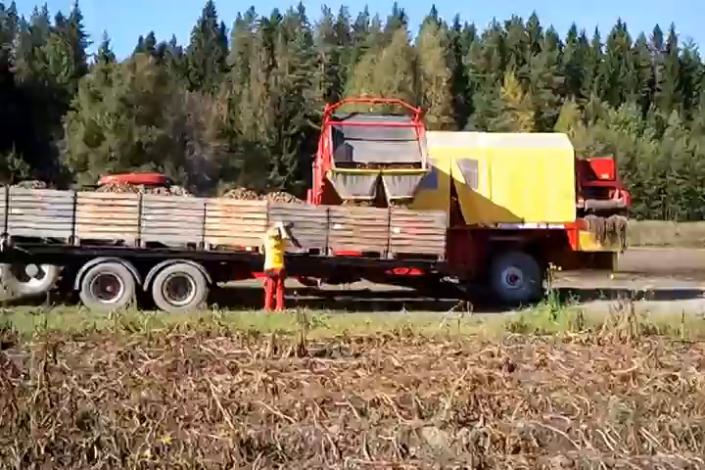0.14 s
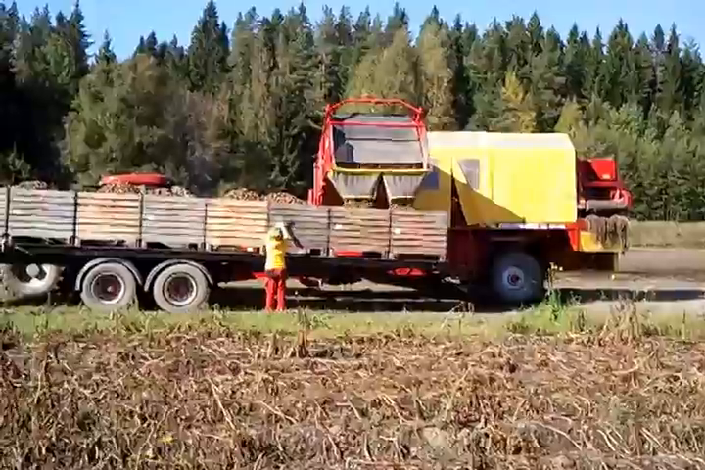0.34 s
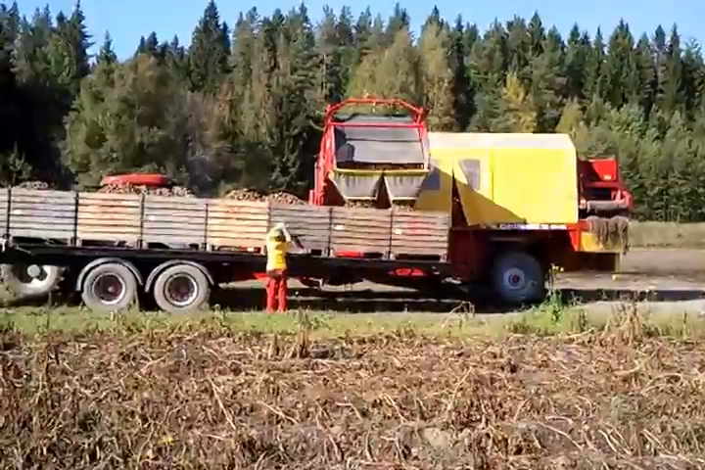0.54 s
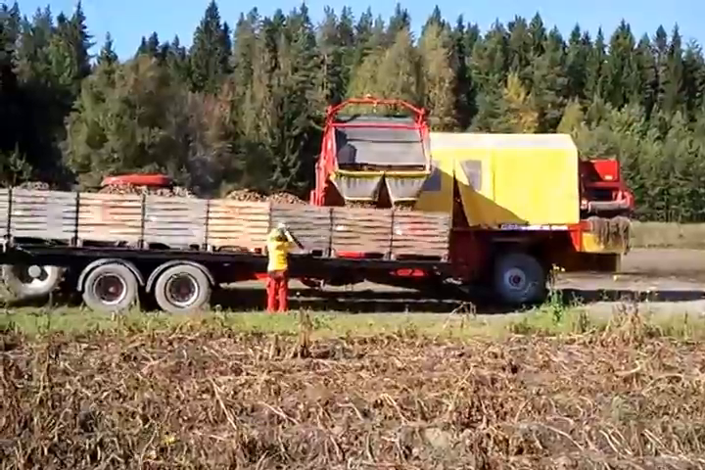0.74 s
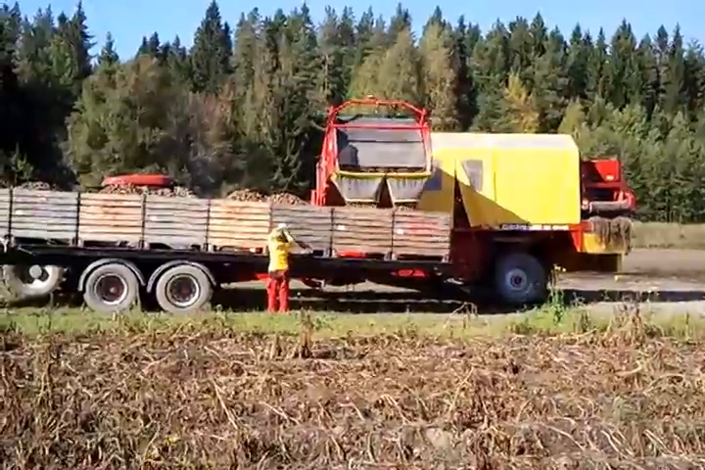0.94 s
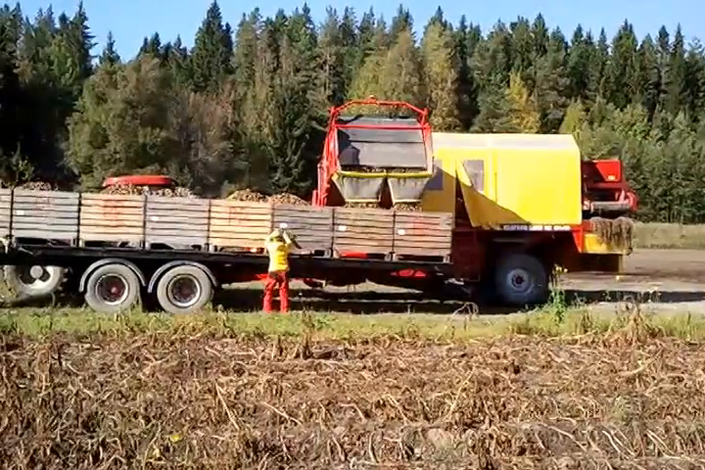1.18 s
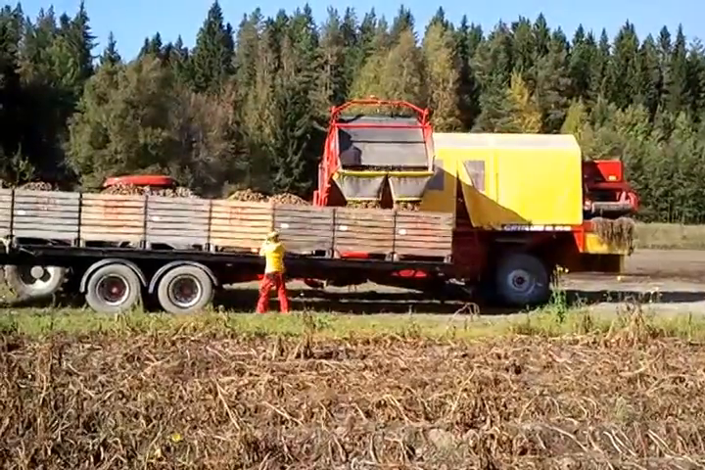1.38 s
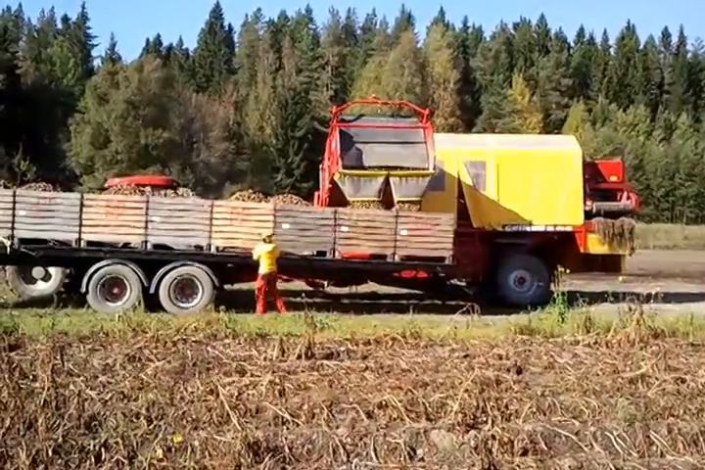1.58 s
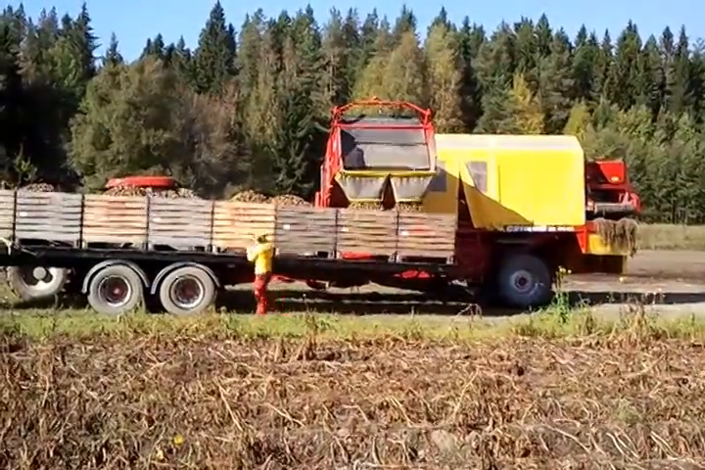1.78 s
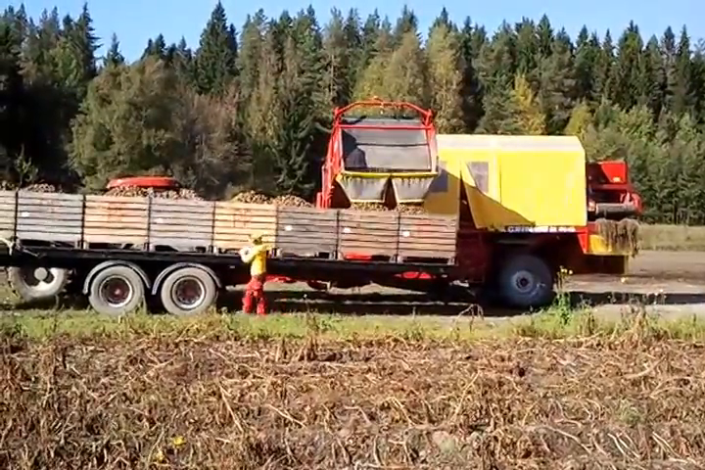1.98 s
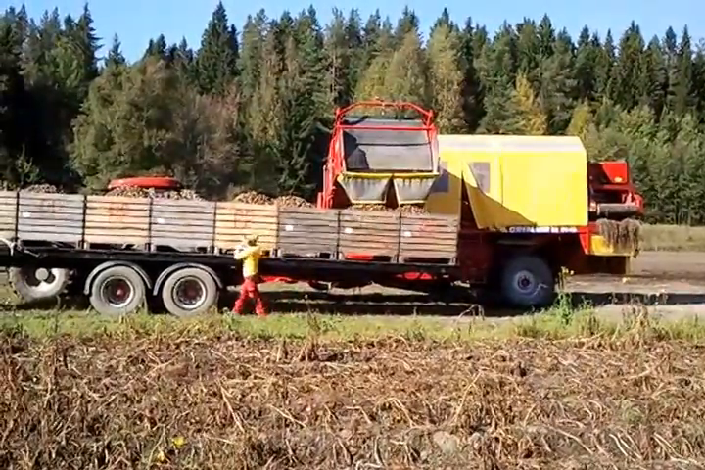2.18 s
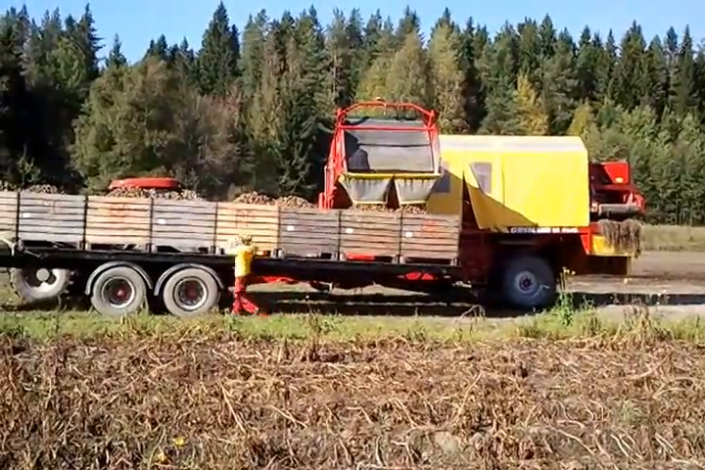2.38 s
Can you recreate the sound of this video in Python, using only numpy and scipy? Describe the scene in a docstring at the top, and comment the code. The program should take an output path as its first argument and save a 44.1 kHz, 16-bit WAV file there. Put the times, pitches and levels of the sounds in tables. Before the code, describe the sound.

A diesel harvester throbs steadily outdoors, its conveyor whining in pulses amid blurred clatter. Two sharp wooden crate knocks land close together near the microphone, surrounded by small ticks, scrapes and bumps, while dry rustling fades.

```python
"""Throughout runs the low throb of a diesel harvester, with a pulsing conveyor whine and a blur of clatter.
The throb and whine are sums of sine tones; rumble, chug and clatter are noise shaped in pitch and level.
Two sharp wooden knocks stand out: crates land with a noisy crack, ring as fading tones and rattle.
Short bursts of shaped noise make ticks, clicks, scrapes and bumps of handling.
Behind them a dry, bright rustle of grainy noise slowly fades."""
import sys
import numpy as np
from scipy.fft import rfft, irfft, next_fast_len
from scipy.io import wavfile
from scipy.ndimage import map_coordinates

SR = 44100
rng = np.random.default_rng(int(sys.argv[2]) if len(sys.argv) > 2 else 0)


def file_out(sig):
    """Save sig as 16-bit WAV at sys.argv[1]."""
    # one column per channel
    cols = np.atleast_2d(sig).T
    # limit, then scale
    lim = np.clip(cols, -1, 1)
    pcm = np.round(lim * 32767).astype(np.int16)
    wavfile.write(sys.argv[1], SR, pcm)


N = 111132


def amp(db):
    """Turn decibels into a gain."""
    return 10 ** (np.asarray(db) / 20)


def unit(x):
    """Scale to an rms (average strength) of 1."""
    return x / np.sqrt(np.mean(x ** 2) + 1e-20)


def clock():
    """Time of every sample, in seconds."""
    return np.arange(N) / SR


def curve(rows):
    """Join (time, value) points with straight lines."""
    return np.interp(clock(), *np.transpose(rows))


def wobble(rate):
    """A smooth random curve shaped by `rate` random points a second."""
    return map_coordinates(rng.standard_normal(4096), [clock() * rate + 2], mode="wrap")


def colour(x, points):
    """Filter x by (frequency, level) points, then bring it to rms 1; only the shape of the points counts."""
    m = next_fast_len(N + 8192)
    hz, db = np.transpose(points)
    log_hz = np.log(np.fft.rfftfreq(m, 1 / SR) + 1)
    gain = amp(np.interp(log_hz, np.log(hz), db))
    return unit(irfft(rfft(x, m) * gain, m)[:N])


def noise(points):
    """Steady noise with the given spectrum, at rms 1."""
    return colour(rng.standard_normal(N), points)


def burst(start, rise, hold, t60):
    """Loudness shape: straight rise, hold, then a fade of 60 dB per t60 seconds."""
    t = clock() - start
    fade = amp(-60 * np.maximum(t - rise - hold, 0) / t60)
    return np.clip(t / rise, 0, 1) * fade


# engine speed: t/s, firings per second
FIRING_RATE = [(0, 46), (.2, 45.1), (.35, 44), (.6, 43.4), (.8, 44.1), (1.05, 45.2), (1.25, 45.9),
               (1.55, 45.3), (1.8, 45.4), (2.15, 45), (2.28, 44), (2.52, 44.8)]


def crank_angle():
    """Radians turned by the crankshaft, which fires twice a turn."""
    return np.pi * np.cumsum(curve(FIRING_RATE)) / SR


def stroke():
    """Swing from -1 to 1 once per crankshaft turn."""
    peak_at = 0.45  # share of a turn
    return np.cos(crank_angle() - 2 * np.pi * peak_at)


# exhaust tones: f/multiple of the crankshaft rate, base level/dB, wavering level/dB
EXHAUST_TONES = [(2, -37.3, .9), (2.5, -53, 1.5), (3, -68, 5), (4, -41, .4), (5, -48, 2.5), (6, -60.5, 4.5),
                 (7, -66, 5), (9, -65, 1)]
# change of the tones above the firing rate: t/s, added level/dB
OVERTONE_LEVEL = [(0, -0.5), (.22, 1), (.45, -1.5), (1.0, -2.5), (1.12, 2.5), (1.5, 0.4), (2.05, -0.5),
                  (2.4, -3)]
SHAFT_JITTER = 0.014  # size of the uneven turning, radians


def exhaust():
    """The throb: tones locked to the crankshaft, each wavering in level and timing."""
    crank = crank_angle()
    throb = np.zeros(N)
    for multiple, db, waver_db in EXHAUST_TONES:
        level = db + waver_db * wobble(9.19)
        if multiple > 2:  # 2 is the firing rate
            level = level + curve(OVERTONE_LEVEL)
        angle = crank + SHAFT_JITTER * wobble(26.85)
        throb += amp(level) * np.sin(multiple * angle)
    return np.sqrt(2) * throb


# spectrum of the low machine noise: f/Hz, relative level/dB per Hz
RUMBLE_SPECTRUM = [(5, -3), (30, -7), (55, -1.5), (90, 0.5), (135, 1.5), (175, -10), (215, -5), (280, -10),
                   (370, -7.5), (450, -10), (540, -6), (660, -10), (740, -20), (1100, -26.5), (2500, -53)]
# rumble loudness before wavering: t/s, level/dB
RUMBLE_LEVEL = [(0, -41.5), (.5, -43.5), (1.1, -44), (1.33, -47.5), (1.6, -44.5), (1.95, -46.5),
                (2.52, -49.5)]


def rumble():
    """Low machine noise that follows a level curve and wavers quickly."""
    level = curve(RUMBLE_LEVEL) + 1.6 * wobble(35.45)
    return amp(level) * noise(RUMBLE_SPECTRUM)


# housing resonance: f/Hz, relative level/dB per Hz
CHUG_SPECTRUM = [(350, -36), (520, -5), (600, 3.5), (640, -2), (680, -6), (740, -29.5)]
CHUG_DB, CHUG_SWING_DB, CHUG_SCATTER_DB = -61.5, 7, 2.5


def chug():
    """A resonant housing colours noise that swells once per crankshaft turn."""
    level = CHUG_DB + CHUG_SWING_DB * stroke() + CHUG_SCATTER_DB * wobble(22.26)
    return amp(level) * noise(CHUG_SPECTRUM)


# spectrum of the machine clatter: f/Hz, relative level/dB per Hz
CLATTER_SPECTRUM = [(300, -7.5), (780, 1), (900, 3.5), (1100, -1.5), (1700, -0.5), (1900, -3), (2450, -1),
                    (3100, -7), (4300, -11), (5800, -7.5), (8000, -18.5), (14300, -31), (14800, -60)]
# clatter loudness before pulsing and wavering: t/s, level/dB
CLATTER_CURVE = [(0, -49), (.25, -49.5), (.45, -50), (1.0, -48), (1.5, -50.5), (1.8, -51.5), (2.52, -53.5)]


def clatter():
    """A blur of machine noise that pulses slightly with every firing."""
    level = curve(CLATTER_CURVE) + 0.5 * wobble(20)
    pulse = 1 + 0.12 * np.sin(2 * crank_angle())
    return amp(level) * pulse * noise(CLATTER_SPECTRUM)


def harvester():
    """Exhaust throb follows the crankshaft, with rumble, chugging housing and clatter beside it."""
    return exhaust() + rumble() + chug() + clatter()


# conveyor drive tones before drift, swelling and wavering: f/Hz, level/dB
WHINE_TONES = [(620, -55.5), (643, -59.5), (1750, -68)]
WHINE_DRIFT_HZ, WHINE_PULSE = 2.41, 0.67


def conveyor():
    """Whining drive tones drift together and swell once per crankshaft turn."""
    drift = WHINE_DRIFT_HZ * wobble(21.86)
    whine = np.zeros(N)
    for hz, db in WHINE_TONES:
        turns = np.cumsum(hz + drift) / SR + rng.random()
        whine += np.sqrt(2) * amp(db) * np.sin(2 * np.pi * turns)
    swell = 1 + WHINE_PULSE * stroke()
    return amp(1.6 * wobble(14.13)) * swell * whine


def ring(modes, start, rise, scatter):
    """A struck crate sounds as fading tones; scatter randomises where each starts in its swing."""
    t = clock() - start
    out = np.zeros(N)
    for hz, db, t60 in modes:
        turns = hz * t + scatter * rng.random()
        out += amp(db) * burst(start, rise, 0, t60) * np.sin(2 * np.pi * turns)
    return out


# the slats rattling on after a knock: f/Hz, relative level/dB per Hz
RATTLE_SPECTRUM = [(150, -14), (350, -5), (650, 2), (950, -11), (1600, -3.5), (2400, -6), (3300, -15),
                   (4300, -30), (5900, -8), (7500, -14), (8800, -4), (11000, -4), (13500, -15),
                   (14800, -24)]
RATTLE_DB, RATTLE_T60, RATTLE_ROUGH_DB = -28, 0.16, 5.5


def rattle(start, rise, hold):
    """Loose slats rattle on after a knock as rough, fading noise."""
    rough = rng.standard_normal(N) * amp(RATTLE_ROUGH_DB * wobble(450))
    slats = colour(rough, RATTLE_SPECTRUM)
    return amp(RATTLE_DB) * burst(start, rise, hold, RATTLE_T60) * slats


# the two landings: t/s, crack level/dB, ring level/dB, rise t/s, hold t/s,
# rebound delay t/s, rebound crack level/dB relative to the first crack
LANDINGS = [(0.8107, -13.5, -25.5, 0.00028, 0.002, 0.011, -11.5),
            (1.1897, -12, -25, 0.0024, 0.0033, 0.0093, -12)]
# tones of the first and second crate: f/Hz, relative level/dB, time to fade by 60 dB t/s
FIRST_CRATE = [(406, -15.5, 0.12), (552, -8, 0.075), (625, -12, 0.19), (890, -8, .1), (950, 11.5, .018),
               (1245, -10.5, 0.086), (1554, -6.5, 0.071), (1687, -8.5, 0.11), (2073, 0, 0.057),
               (2384, -3.5, 0.047), (3000, -9, .04), (6340, -18, .06), (8600, -3, 0.027), (9700, -5, .06),
               (11400, -4, .083), (12200, -1, 0.057)]
SECOND_CRATE = [(347, -15, .15), (395, -9, 0.19), (656, 1.5, 0.15), (929, -3.5, 0.12), (961, 8.5, 0.046),
                (1218, -2.5, 0.073), (1445, -7, 0.091), (1582, -1, 0.11), (1710, -7, .05),
                (2086, -4, 0.054), (2493, 3, .03), (2570, -9, 0.052), (6160, 0, .025), (8750, -4, .06),
                (10086, 1, 0.083), (10550, -8, .06), (11300, -12, .09)]
# crack of a contact: f/Hz, relative level/dB per Hz
CRACK_SPECTRUM = [(150, -17), (400, -7.5), (900, -10), (1400, -17), (2400, -8), (3300, -21.5), (4300, -26),
                  (5800, -11.5), (6500, -18), (7500, -24), (8750, -1), (10200, -4), (10900, 7),
                  (11400, 1.5), (12200, -2), (13300, -19), (14500, -16), (15000, -31)]
CRACK_T60, REBOUND_T60, REBOUND_HOLD_S = 0.026, 0.031, 0.0083
# new ringing, relative to the first: at the rebound, then as the crate settles (s after the blow)
REBOUND_RING_DB, SETTLE_S, SETTLE_DB = -6, 0.031, -17


def knocks():
    """Each crate lands with a short crack, rings, rebounds, settles and rattles out."""
    out = np.zeros(N)
    for landing, modes in zip(LANDINGS, (FIRST_CRATE, SECOND_CRATE)):
        start, crack_db, ring_db, rise, hold, delay, rebound_db = landing
        blow = burst(start, rise, hold, CRACK_T60)
        rebound = amp(rebound_db) * burst(start + delay, rise, REBOUND_HOLD_S, REBOUND_T60)
        # the two contacts add by energy
        out += amp(crack_db) * np.hypot(blow, rebound) * noise(CRACK_SPECTRUM)
        out += rattle(start, rise, hold)

        # only the longer-lasting tones ring anew
        lasting = [mode for mode in modes if mode[2] > CRACK_T60 * 2]
        rebound_ring = amp(REBOUND_RING_DB) * ring(lasting, start + delay, rise, 0.98)
        settling_ring = amp(SETTLE_DB) * ring(lasting, start + SETTLE_S, rise, 0.95)
        first_ring = ring(modes, start, rise, 0)
        out += amp(ring_db) * (first_ring + rebound_ring + settling_ring)
    return out


# wood spectrum shared by scrapes and clicks: f/Hz, relative level/dB per Hz
WOOD_SPECTRUM = [(200, -26), (600, -9), (1000, -10), (1600, 5), (2400, 5), (3300, -2), (4500, -8),
                 (6200, -2.5), (7500, -7), (10000, 4), (14000, -33)]
# wood scraping: start t/s, length t/s, level/dB at the middle of the swell
SCRAPE_EVENTS = [(0.18, 0.085, -49.5), (0.722, 0.034, -44), (0.99, 0.078, -43.5), (1.374, 0.077, -41.5),
                 (1.439, 0.061, -48.5)]


def scrapes(grain_db=3.5):
    """Wood slips in small grains: rough noise swells and fades with each scrape."""
    shape = np.zeros(N)
    for start, length, db in SCRAPE_EVENTS:
        progress = np.clip((clock() - start) / length, 0, 1)
        shape += amp(db) * np.sin(np.pi * progress)
    grains = rng.standard_normal(N) * amp(grain_db * wobble(700))
    return shape * colour(grains, WOOD_SPECTRUM)


# spectrum shared by dry ticks and rustle: f/Hz, relative level/dB per Hz
DRY_SPECTRUM = [(1000, -19), (3000, -17.5), (4300, -25.5), (5800, -14.5), (6600, -9.5), (7600, -16.5),
                (8700, -0.5), (9400, -3.5), (10700, 3.5), (11500, -1), (13000, -13), (14450, -18),
                (14750, -50)]
# small dry ticks: t/s, level/dB, time to fade by 60 dB t/s
TICK_EVENTS = [(0.563, -28.5, 0.022), (0.575, -27, .025), (0.727, -30, 0.037), (0.8073, -33, 0.016),
               (0.9525, -25, 0.013), (1.0405, -38, .03), (1.2475, -33.5, 0.037), (1.6405, -33, 0.022),
               (1.919, -38.5, 0.021), (2.0534, -33.5, 0.019), (2.132, -39.5, .03)]


def ticks():
    """Small dry contacts: bright noise with a very fast start."""
    shape = sum(amp(db) * burst(start, 0.0003, 0, t60) for start, db, t60 in TICK_EVENTS)
    return shape * noise(DRY_SPECTRUM)


# small wooden clicks: t/s, level/dB, time to fade by 60 dB t/s
CLICK_EVENTS = [(0.7277, -40, .025), (1.3596, -53, .025), (1.3916, -49, 0.018), (1.4115, -39, 0.022),
                (1.5564, -40.5, 0.045), (1.6065, -44, .025), (1.7513, -47, .025)]


def clicks():
    """Small wooden contacts: quick bursts of wood-coloured noise."""
    shape = sum(amp(db) * burst(start, 0.0005, 0, t60) for start, db, t60 in CLICK_EVENTS)
    return shape * noise(WOOD_SPECTRUM)


# dull bumps: t/s, level/dB
BUMP_EVENTS = [(.0, -36.5), (0.034, -41), (.108, -37), (.23, -37.5), (0.272, -37.5), (0.332, -42),
               (0.627, -38), (.853, -43), (.94, -39), (1.492, -37.5), (1.649, -41), (1.722, -42.5)]
# colour of a bump: f/Hz, relative level/dB per Hz
BUMP_SPECTRUM = [(100, -47), (250, -18), (400, 4.5), (650, 5), (1000, -12.5), (3000, -32)]
BUMP_T60 = 0.087  # s


def bumps():
    """Dull contacts: softly starting bursts of low-pitched noise."""
    shape = sum(amp(db) * burst(start, 0.0027, 0, BUMP_T60) for start, db in BUMP_EVENTS)
    return shape * noise(BUMP_SPECTRUM)


def handling():
    """Brief contacts of handled crates: scrapes, ticks, clicks and bumps."""
    return scrapes() + ticks() + clicks() + bumps()


# rustle loudness before flutter: t/s, level/dB
RUSTLE_LEVEL = [(0, -39.5), (.13, -45), (.21, -41), (.3, -43), (.37, -41.5), (.45, -43.5), (.75, -45),
                (.87, -42.5), (1.05, -40), (1.15, -46), (1.25, -43.5), (1.6, -47.5), (2.15, -50),
                (2.52, -52.5)]


def rustle(grain_db=1.5, flutter_db=1.45):
    """Many tiny dry contacts blend into a bright, grainy, fluttering hiss."""
    grains = rng.standard_normal(N) * amp(grain_db * wobble(1400))
    level = curve(RUSTLE_LEVEL) + flutter_db * wobble(60)
    return amp(level) * colour(grains, DRY_SPECTRUM)


def scene():
    """Add all the sources in the open air, in mono."""
    return (harvester() + conveyor() + rustle() + knocks() + handling())[None]


TOP_HZ = 15000


def record(dry):
    """Round off the highest peaks, then cut steeply above the top frequency."""
    m = next_fast_len(N + 8192)
    rounded = dry / (1 + (dry / 0.75) ** 6) ** (1 / 6)
    gain = 1 / (1 + (np.fft.rfftfreq(m, 1 / SR) / TOP_HZ) ** 120)
    return irfft(rfft(rounded, m) * gain, m)[:, :N]


dry = scene()
out = record(dry)
file_out(out)
```